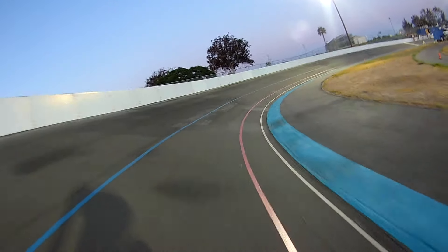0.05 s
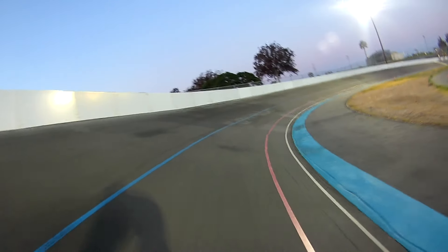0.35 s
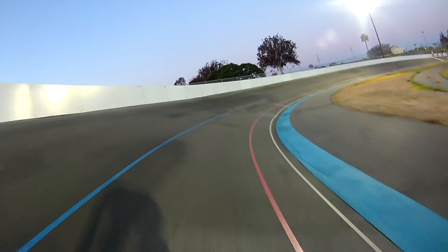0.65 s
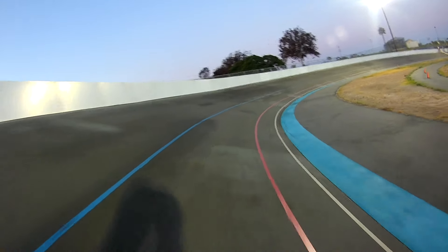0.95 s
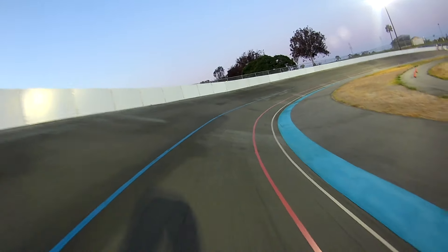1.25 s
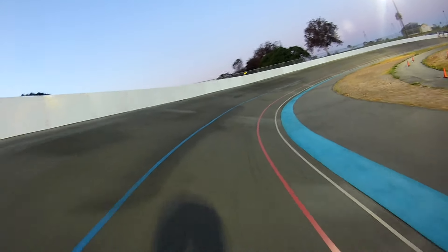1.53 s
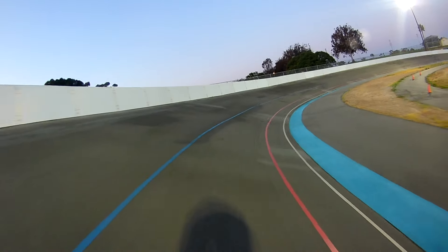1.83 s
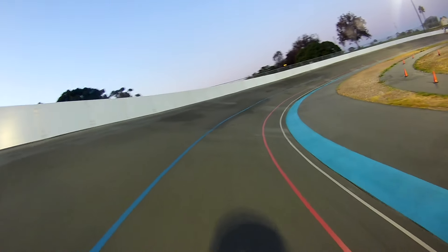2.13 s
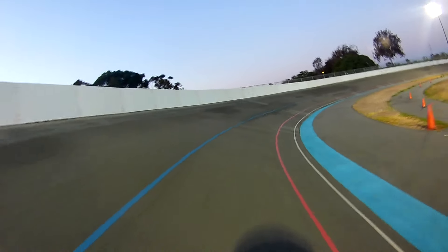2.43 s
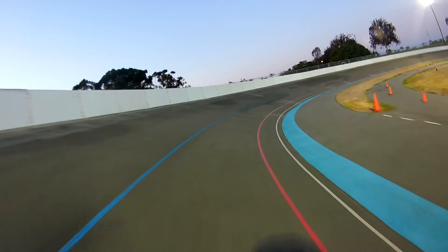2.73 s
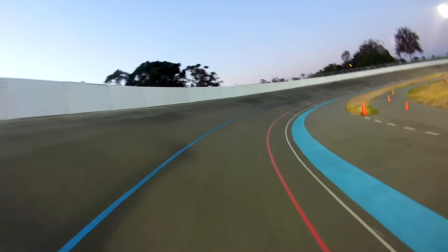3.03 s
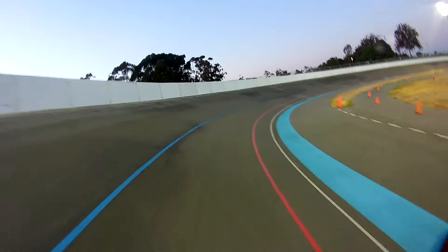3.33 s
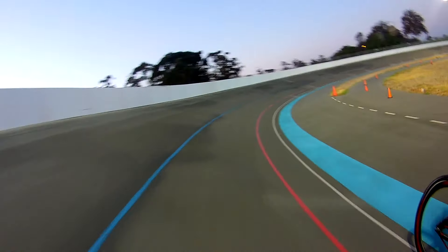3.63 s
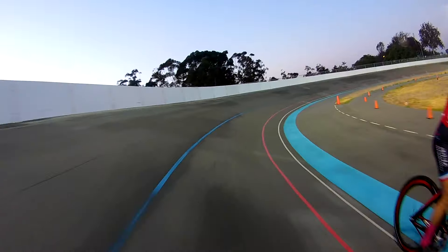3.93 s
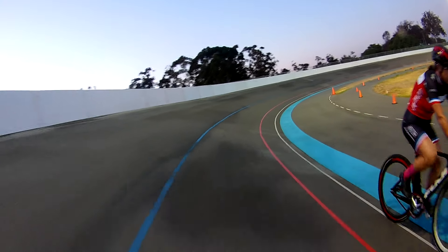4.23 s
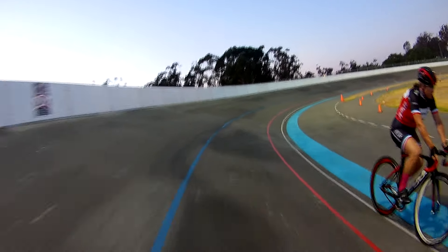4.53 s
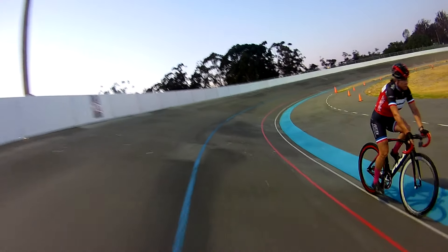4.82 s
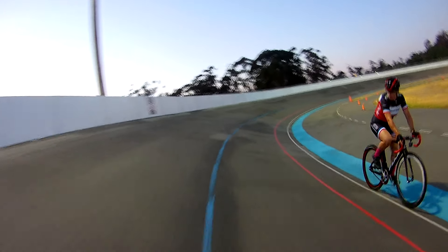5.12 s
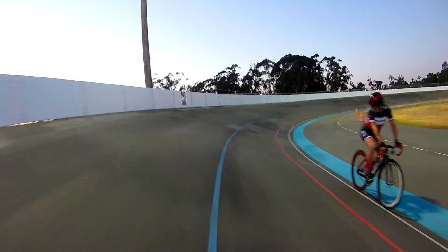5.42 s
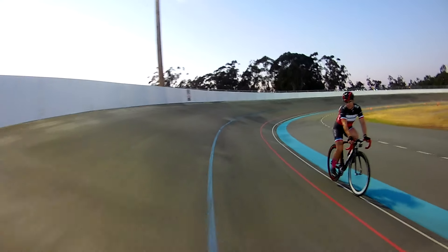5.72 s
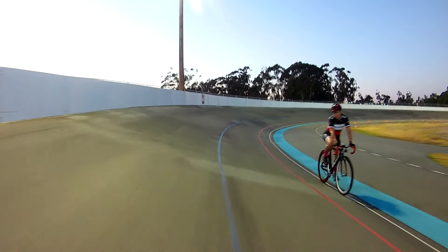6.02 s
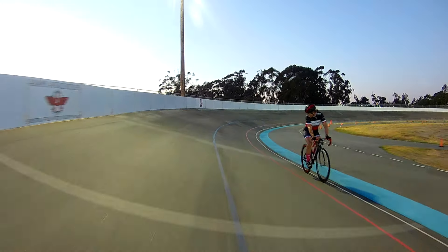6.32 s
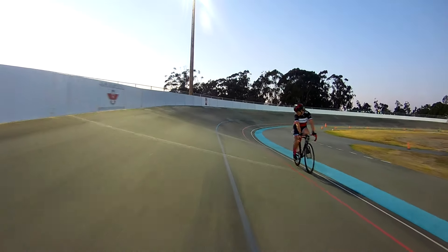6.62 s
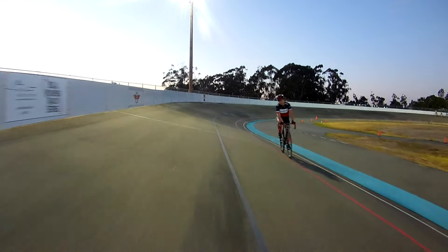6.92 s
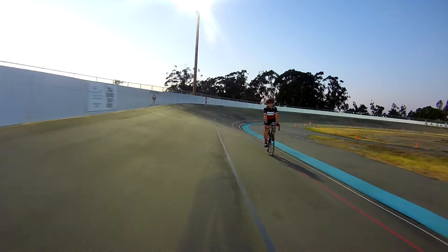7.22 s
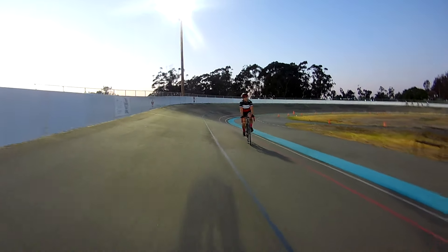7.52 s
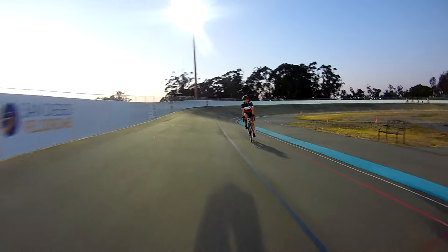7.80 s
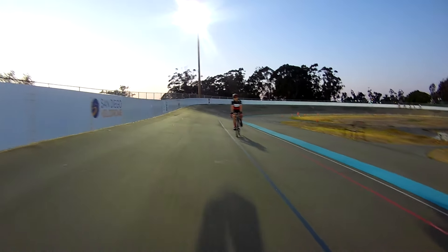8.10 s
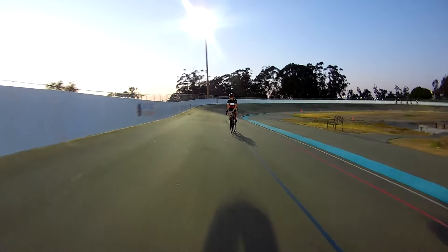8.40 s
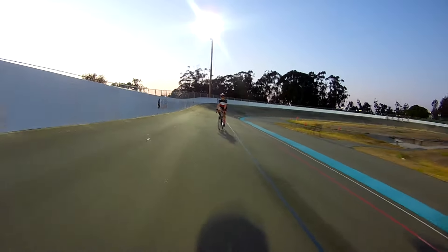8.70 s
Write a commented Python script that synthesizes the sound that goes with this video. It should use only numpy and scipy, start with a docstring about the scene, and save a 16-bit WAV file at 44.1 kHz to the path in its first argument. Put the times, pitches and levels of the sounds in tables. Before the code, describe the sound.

Rapid metallic chain clatter and tyre roar from a moving bicycle, with rumbling wind that buffets the microphone midway.

```python
"""A track bicycle laps a concrete velodrome, heard from a camera clamped to its frame.
From the start the chain rattles tooth by tooth, ringing steel and camera case, over roaring tyres,
a droning frame and rumbling wind. Hard chain slaps soon cut through. A lone eddy thumps the
microphone at 2.6 s; from 4.1 to 5.7 s a flurry of them overloads it, and the strongest gust rasps.
Then the wind eases and the rattle and slaps carry on, with one more gust at the end."""
import sys
import numpy as np
from scipy import signal
from scipy.fft import rfft, irfft, next_fast_len
from scipy.io import wavfile
from scipy.ndimage import map_coordinates

SR = 44100
rng = np.random.default_rng(int(sys.argv[2]) if len(sys.argv) > 2 else 0)


def transcribe(u):
    """Save the signal u as a 16-bit wav file named by the first command-line argument.

    u: samples, shape (n,) or (channels, n), limited to [-1, 1]; the rate is SR.
    q: integer samples, one column per channel.
    """
    v = np.clip(np.atleast_2d(u).T, -1, 1)
    q = np.round(v * 32767).astype(np.int16)
    wavfile.write(sys.argv[1], SR, q)


N = 394694
T = np.arange(N) / SR

# Levels in the tables are relative; each layer sets its own gain.
# teeth meeting the chain: t/s, rate/Hz
TOOTH_RATE = [(0, 74.2), (2.2, 74.2), (2.9, 76), (6.1, 75.6), (6.9, 76.6), (8.95, 75.5)]
# hollow clack of the camera case: f/Hz, level/dB
CASE_COLOUR = [(600, -38), (1215, -17.5), (1290, -2.5), (1420, 0.5), (1510, 1), (1590, -4), (1700, -3),
               (1805, -10), (1880, -25.5), (2100, -34.5), (3000, -80)]
# ringing modes of chain and sprocket: f/Hz, width/Hz, level/dB
STEEL_MODES = [(2355, 80, -2.5), (2583, 160, -10), (2975, 76, -13), (3320, 74, -2.5), (3468, 138, 0.5),
               (3866, 240, -12), (4310, 113, -4.5), (4500, 64, -9.5), (4800, 130, -18), (5560, 310, -30),
               (5960, 220, -29.5), (6150, 150, -27), (6800, 220, -34.5), (7030, 230, -30),
               (10000, 190, -17.5)]
# the chain whips and rattles harder: t/s, length/s, lift/dB
CHAIN_WHIPS = [(.41, 0.26, 5.5), (1.41, 0.4, 3.5), (1.8, .29, 6), (2.53, 0.17, 3), (2.87, 0.36, 3.5),
               (3.25, 0.14, 7.5), (4.03, 0.24, 3.5), (4.31, 0.16, 5.5), (4.57, 0.15, 8), (5.02, 0.04, 7),
               (5.33, 0.1, 8), (5.63, 0.15, 7.5), (5.87, 0.14, 4.5), (6.39, 0.17, 6), (6.76, 0.2, 6.5),
               (7.0, 0.29, 7.5), (7.77, 0.11, 9.5), (8.22, 0.35, 6)]
# roar of tyres on concrete: f/Hz, level/dB
TYRE_COLOUR = [(100, -21.5), (300, -1.5), (480, 1.5), (760, 5), (880, -0.5), (965, 6), (1040, -1.5),
               (1130, 2), (1215, -5), (1300, -1), (1750, 1.5), (1950, -24.5), (4500, -31.5), (7500, -78)]
# low modes of frame and camera mount: f/Hz, width/Hz, level/dB
FRAME_MODES = [(66.6, 5.4, 0), (80, 18.5, -5.5), (133.2, 18, -13.5), (150, 23.8, -8), (231, 11, -13)]
# rise and fall of the frame's drone: t/s, level/dB
DRONE_LEVEL = [(0.0, -19), (0.96, -15.5), (1.24, -27.5), (1.34, -15.5), (1.86, -21), (3.79, -15.5),
               (3.94, -24.5), (4.56, -11.5), (4.76, -17.5), (5.48, -11.5), (5.87, -19.5), (8.9, -17)]
# slow swell of the headwind around the lap: t/s, level/dB
HEADWIND_LEVEL = [(0, 2), (.9, 1), (1.25, -0.5), (2.3, -1), (3.6, 3), (4.05, 1), (4.8, 3.5), (5.9, -2),
                  (6.3, 1.5), (7.1, -3.5), (7.6, -3), (8.3, -3.5), (8.95, 4.5)]
# gusts on top of it: t/s, length/s, lift/dB
WIND_GUSTS = [(.38, 0.63, 2), (2.58, 0.34, 3.5), (4.18, .5, 5), (4.95, 0.71, 7.5), (8.55, 0.59, 2)]
# deep rumble of turbulence: f/Hz, level/dB
RUMBLE_COLOUR = [(8, -13.5), (26, -7), (55, 1.5), (100, -16), (200, -24.5), (500, -48), (1500, -91)]
# low-mid flutter of air on the case: f/Hz, level/dB
FLUTTER_COLOUR = [(60, -13.5), (140, -1), (240, 2.5), (400, -6), (700, -16.5), (1500, -22.5), (3000, -39),
                  (7000, -82.5), (9000, -83.5), (15000, -93)]
# hard slaps of the chain and jolts of the frame: t/s, clack level/dB, steel level/dB
SLAP_HITS = [(0.429, -28, -21.5), (.692, -11, -28), (1.421, -11.5, -31), (1.692, -4, -33),
             (2.015, -6.5, -25), (2.612, -21, -32), (3.044, -12, -22.5), (3.28, -12.5, -21.5),
             (3.524, -12, -17.5), (3.619, -10.5, -23.5), (4.241, -9, -21.5), (4.32, -6, -29),
             (4.481, -6.5, -11), (4.583, -7, -14.5), (4.62, -7.5, -23), (5.801, -5.5, -23.5),
             (5.894, -13.5, -31.5), (6.068, -12, -25.5), (6.414, -6, -10.5), (6.464, -6, -33),
             (6.669, -10, -19.5), (6.723, -10.5, -18), (6.87, -9, -21), (7.09, -3.5, -22),
             (7.172, -13, -34), (7.984, -11, -26.5), (8.502, -19, -17.5), (8.568, -11, -22)]
# bright snap on a slap: f/Hz, level/dB
SNAP_COLOUR = [(1000, -19), (4300, -1), (7000, -1.5), (8000, -24), (9200, -20), (11000, -34.5)]
# eddies striking the microphone: t/s, level/dB
EDDY_HITS = [(2.61, -.5), (4.14, 0.5), (4.222, -2), (4.346, 3), (4.384, -4), (4.429, 0), (4.492, 8),
             (4.579, -10.5), (4.622, 1), (4.986, -8.5), (5.032, -3), (5.228, -3.5), (5.249, -9.5),
             (5.337, 0), (5.428, 0.5), (5.488, -9.5), (5.625, 0.5), (5.668, -0.5)]
# dull thump of an eddy: f/Hz, level/dB
THUMP_COLOUR = [(15, 5), (50, -7.5), (200, -4.5), (370, -1), (600, -4.5), (1000, -22), (2000, -25.5),
                (4500, -44.5), (8000, -68.5), (15000, -76)]
# bright edge of tearing air: f/Hz, level/dB
TEAR_COLOUR = [(1000, 6.5), (3500, 7), (6500, -0.5), (8000, -16.5), (9000, -9.5), (11500, -10.5),
               (13500, -23)]
# air tearing past the microphone hole: t/s, length/s, level/dB
RASP_FITS = [(5.224, .22, -48), (5.316, 0.023, -37), (5.47, .11, -42)]


def amp(db):
    """Decibels to gain."""
    return 10 ** (np.asarray(db) / 20)


def unit(x):
    """Scale to rms 1."""
    return x / np.sqrt(np.mean(x ** 2) + 1e-20)


def curve(points):
    """An envelope through (time, value) points."""
    return np.interp(T, *np.transpose(points))


def swells(rows, rise_s, fall_s):
    """Sum of (start, length, height) swells that rise, hold and fall."""
    return sum(height * np.clip(np.minimum((T - s) / rise_s, (s + length - T) / fall_s) + 0.5, 0, 1)
               for s, length, height in rows)


def wobble(rate):
    """A smooth random curve, rate knots a second."""
    return map_coordinates(rng.standard_normal(int(N * rate / SR) + 4), [T * rate])


def noise():
    """Fresh white noise."""
    return rng.standard_normal(N)


def response(gain, size=16384):
    """The minimum-phase impulse response for a gain against frequency."""
    hz = np.fft.rfftfreq(size, 1 / SR)
    cepstrum = irfft(np.log(gain(hz) + 1e-6))
    cepstrum[1:size // 2] *= 2
    cepstrum[size // 2 + 1:] = 0
    return irfft(np.exp(rfft(cepstrum)))[:size // 2]


def colour(points):
    """The impulse response of an EQ curve through (Hz, dB) points."""
    f, db = np.transpose(points)
    return response(lambda hz: amp(np.interp(np.log(hz + 1), np.log(f), db)))


def resonances(modes, hz):
    """Gain at hz of steep-sided resonant peaks."""
    return sum(amp(db) / (1 + 2 * ((hz - centre) / width) ** 2) for centre, width, db in modes)


def through(x, body):
    """x played through an impulse response."""
    return signal.fftconvolve(x, body)[:N]


def bed(body, drive=1):
    """Noise, shaped by a drive envelope, played through a body at rms 1."""
    return unit(through(drive * noise(), body))


def blows(times, peaks_db, body, decay_s, size=4096):
    """Short scrapes of noise that ring a body, each up to its own peak level."""
    out, t = np.zeros(N + size), np.arange(size) / SR
    for s, db in zip(times, peaks_db):
        scrape = rng.standard_normal(size) * np.exp(-t / decay_s)
        ring = signal.fftconvolve(scrape, body)[:size]
        out[round(s * SR):][:size] += amp(db) * ring / np.abs(ring).max()
    return out[:N]


def steel_ring(muffle_hz=7000, leak_db=-27):
    """The steel modes, muffled by the closed camera case."""
    def gain(hz):
        wall = 1 / np.sqrt(1 + (hz / muffle_hz) ** 24) + amp(leak_db)
        return resonances(STEEL_MODES, hz) * wall
    return response(gain)


def meshing(scatter_db=7.5, cluster_db=1.86, jitter_s=0.001, attack_s=0.00036, decay_s=0.0043):
    """Contact force: each roller lands on its tooth a little early or late and settles."""
    teeth_passed = np.cumsum(curve(TOOTH_RATE)) / SR
    due = np.flatnonzero(np.diff(np.floor(teeth_passed)))
    late, hard = rng.standard_normal((len(due), 2)).T
    at = np.clip(due + late * jitter_s * SR, 0, N - 1).astype(int)
    landings = np.bincount(at, amp(scatter_db * np.tanh(hard)), N)
    landings *= amp(cluster_db * wobble(22))  # the chain whips, so hard landings cluster
    t = np.arange(1024) / SR
    contact = np.exp(-t / decay_s) * (1 - np.exp(-t / attack_s))
    return unit(through(landings, contact))


def chain(case, steel, clack_db=-29.5, ring_db=-45, build_db_per_s=0.2, rub=0.062):
    """Each landing clacks the case and rings the steel, harder on a whip; the links rub in between."""
    whip_db = swells(CHAIN_WHIPS, rise_s=0.036, fall_s=0.06)
    build_db = build_db_per_s * T  # the rider works up to the straight
    force = meshing()
    clack = amp(clack_db + 0.87 * whip_db) * bed(case, force)
    ring = amp(ring_db + build_db + whip_db) * bed(steel, force + rub)
    return clack + ring


def air_flow():
    """Strength of the wind in dB: headwind plus gusts."""
    return curve(HEADWIND_LEVEL) + swells(WIND_GUSTS, rise_s=0.065, fall_s=0.21)


def tyres(case, roar_db=-26, shake_db=-24, uneven_db=1.24):
    """Concrete grain roars in the tyres and shakes the case; the roar lifts a little with air flow."""
    roar = amp(roar_db + 0.17 * air_flow()) * bed(colour(TYRE_COLOUR))
    shake = amp(shake_db) * bed(case)
    return amp(uneven_db * wobble(9)) * (roar + shake)


def frame(trim_db=-0.5, waver_db=1.5):
    """The track shakes the frame and camera mount into a wavering drone."""
    level_db = curve(DRONE_LEVEL) + trim_db + waver_db * wobble(6)
    body = response(lambda hz: resonances(FRAME_MODES, hz))
    return amp(level_db) * bed(body)


def wind(rumble_db=-24.5, flutter_db=-26, flap_db=3):
    """Turbulence rumbles and flutters on the case, both growing with the air flow."""
    flow_db = air_flow()
    rumble = amp(rumble_db + 1.02 * flow_db) * bed(colour(RUMBLE_COLOUR))
    flapping = amp(flap_db * wobble(40))
    flutter = amp(flutter_db + 0.79 * flow_db) * flapping * bed(colour(FLUTTER_COLOUR))
    return rumble + flutter


def slaps(case, steel, ring_trim_db=-2, snap_db=-25, hard_db=-10, bite=1.2):
    """Chain slaps and frame jolts punch out of the rattle; harder hits on steel snap more brightly."""
    times, clack_db, steel_db = np.transpose(SLAP_HITS)
    clacks = blows(times, clack_db, case, decay_s=0.002)
    rings = blows(times, steel_db + ring_trim_db, steel, decay_s=0.0035)
    snaps = blows(times, snap_db + bite * (steel_db - hard_db), colour(SNAP_COLOUR), decay_s=0.0012)
    return clacks + rings + snaps


def eddies(thump_db=-0.9, push_db=-2, swing_s=0.0075, front_s=0.00038):
    """Each eddy first sucks at the microphone, then breaks on it in a steep front and a dull thump."""
    times, level_db = np.transpose(EDDY_HITS)
    thumps = blows(times, level_db + thump_db, colour(THUMP_COLOUR), decay_s=0.004)
    t = np.arange(-SR // 20, SR // 20) / SR
    suck_and_push = np.tanh(t / front_s) * np.exp(-np.abs(t) / swing_s)
    strikes = np.bincount((times * SR).astype(int), amp(level_db + push_db), N)
    return thumps + signal.fftconvolve(strikes, suck_and_push, "same")


def cracks(crack_db=-27):
    """Each eddy cracks sharply as it breaks."""
    times, level_db = np.transpose(EDDY_HITS)
    return blows(times, crack_db + 1.1 * level_db, colour(TEAR_COLOUR), decay_s=0.0011)


def rasp(spits_per_s=170, scatter_db=5, decay_s=0.00055, edge_s=0.01):
    """The strongest gust tears off the microphone hole in short fits of sharp, separate spits."""
    fits = swells([(s, length, amp(db)) for s, length, db in RASP_FITS], edge_s, edge_s)
    count = int(spits_per_s * N / SR)
    sizes = amp(scatter_db * np.tanh(rng.standard_normal(count)))
    onsets = np.bincount(rng.integers(0, N, count), sizes, N)
    spits = through(onsets, np.exp(-np.arange(256) / SR / decay_s))
    return fits * bed(colour(TEAR_COLOUR), spits)


def scene():
    """Bicycle and air meet at the camera in one mono mix."""
    case, steel = colour(CASE_COLOUR), steel_ring()
    bicycle = chain(case, steel) + slaps(case, steel) + tyres(case) + frame()
    air = wind() + rasp() + eddies() + cracks()
    return (bicycle + air)[None]


def record(dry, hardness=7, hiss_db=-80, dull_hz=14000, top_hz=15800):
    """The input soft-clips the biggest peaks, hisses faintly and rolls off towards its band limit."""
    squashed = dry / (1 + np.abs(dry) ** hardness) ** (1 / hardness)
    size = next_fast_len(N + 8192)
    hz = np.fft.rfftfreq(size, 1 / SR)
    dulled = rfft(squashed, size) / (1 + (hz / dull_hz) ** 10)
    hiss = amp(hiss_db) * rfft(noise(), size)
    return irfft((dulled + hiss) * (hz < top_hz), size)[:, :N]


dry = scene()
out = record(dry)
transcribe(out)
```